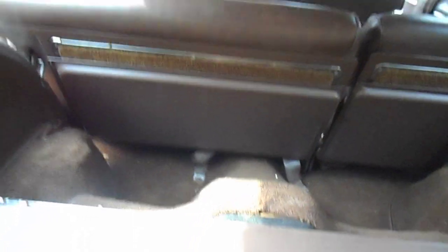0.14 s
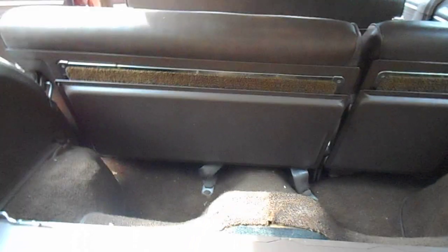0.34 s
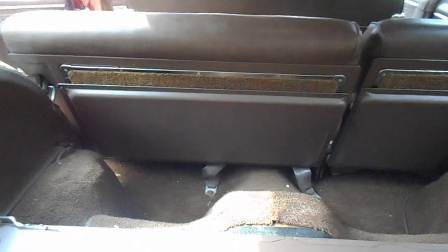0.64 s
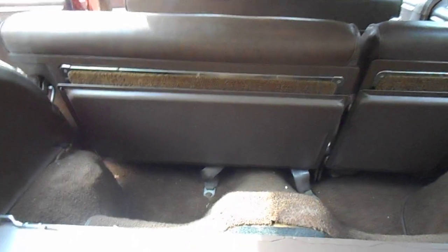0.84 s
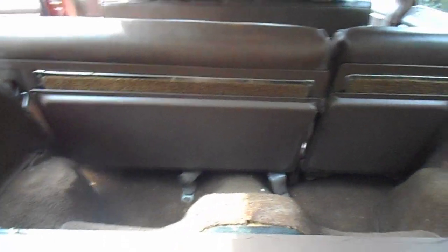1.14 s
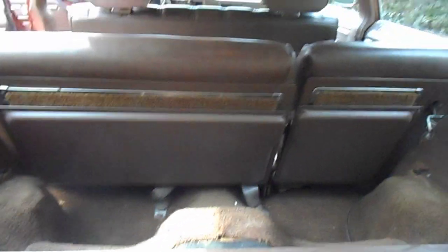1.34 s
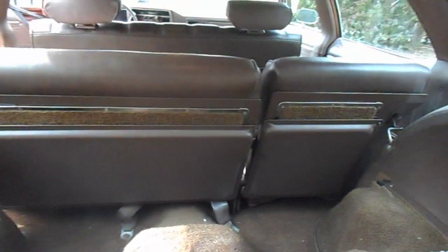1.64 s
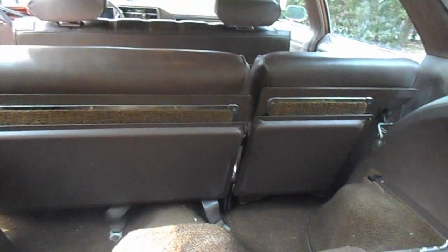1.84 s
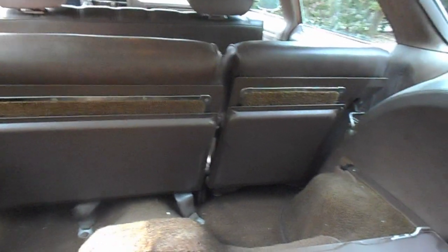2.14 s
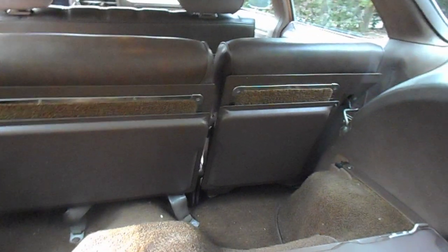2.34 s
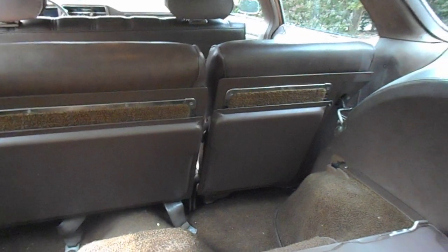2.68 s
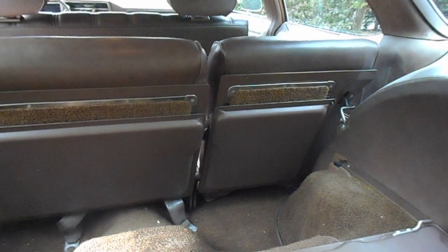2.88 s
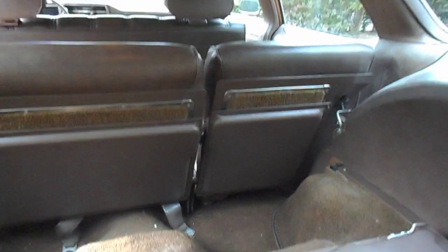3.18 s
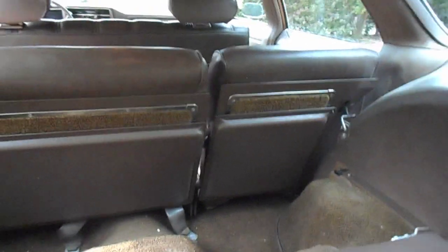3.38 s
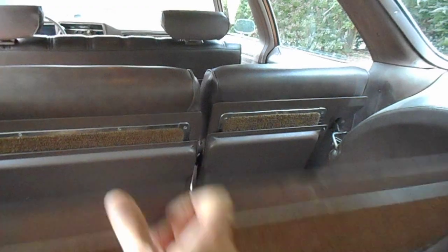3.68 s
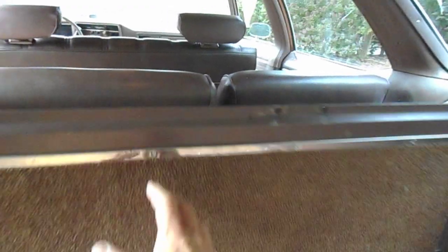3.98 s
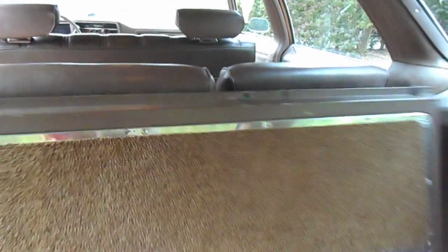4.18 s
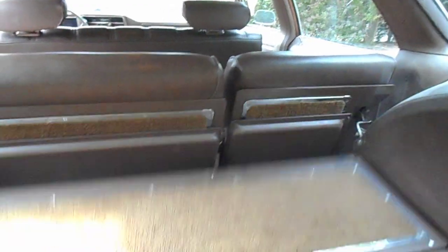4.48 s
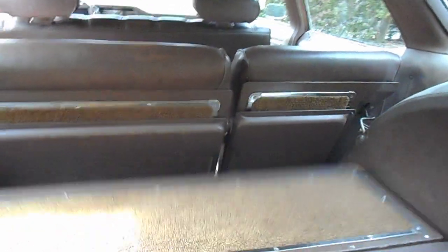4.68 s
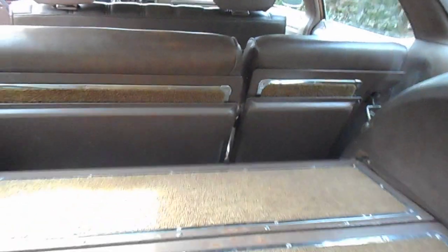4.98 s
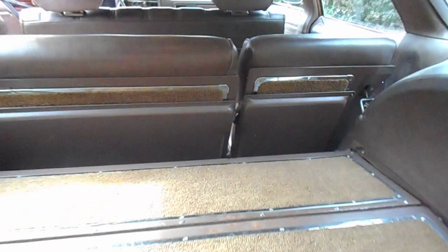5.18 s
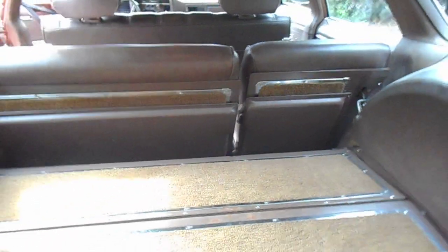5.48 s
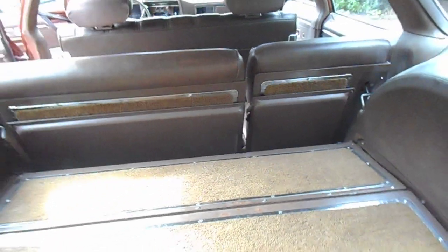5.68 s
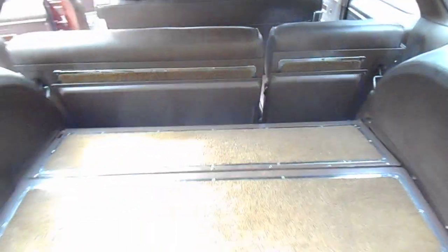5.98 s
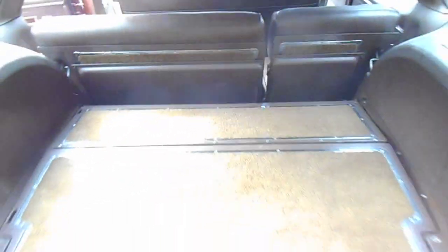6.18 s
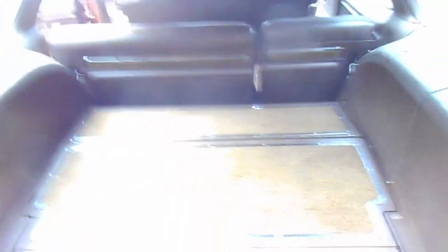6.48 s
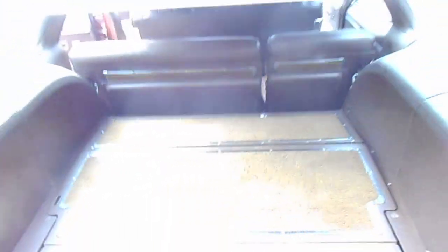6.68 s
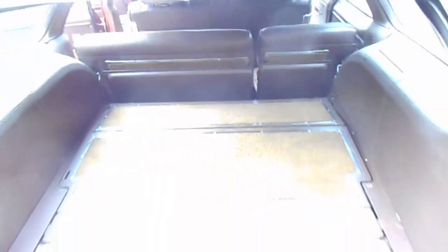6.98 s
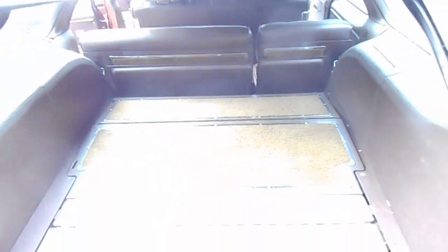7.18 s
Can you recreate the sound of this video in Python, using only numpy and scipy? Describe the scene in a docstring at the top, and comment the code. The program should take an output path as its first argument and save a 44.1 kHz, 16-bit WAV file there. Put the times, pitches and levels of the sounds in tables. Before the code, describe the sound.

Heard close by hand from a car's open tailgate: very quiet outdoor hiss, a faint bird whistle, soft trim knocks and sleeve rustles. Latches clack, then the seat back slams down extremely loud, boomy and rattling, bouncing several times ever faster and softer. A low rumble lingers while a loose fitting taps, hard ticks sound and a hand scuffs vinyl.

```python
"""In the back of an estate car, heard from the open tailgate, a seat back is folded flat and bounces to rest.
Decaying noise for the board and damped modes for shell and cabin air make each slam; a low rumble follows.
Trim knocks, latch clacks and ticks are bursts of resonant noise; cloth and a hand on vinyl are grainy noise.
Squeaks, faint bird whistles and thin far tones are wavering sines, over an outdoor hiss and a distant rush."""
import sys
import numpy as np
from scipy import signal
from scipy.fft import rfft, irfft, next_fast_len
from scipy.io import wavfile
from scipy.ndimage import map_coordinates

SR = 44100
rng = np.random.default_rng(int(sys.argv[2]) if len(sys.argv) > 2 else 0)


def log_audio(samples):
    """Write samples as a 16-bit WAV file to the path given in sys.argv[1]."""
    # one column per channel
    frames = np.atleast_2d(samples).T
    # limit to full scale, then quantise
    limited = np.clip(frames, -1, 1)
    pcm = np.round(limited * 32767).astype(np.int16)
    wavfile.write(sys.argv[1], SR, pcm)


N = 323253  # samples
TIME = np.arange(N) / SR  # seconds


def amp(db):
    """Decibels to gain."""
    return 10 ** (np.asarray(db) / 20)


def unit(x):
    """Scaled to rms 1."""
    return x / np.sqrt(np.mean(x ** 2) + 1e-20)


def along(points, hz):
    """(Hz, value) points read on a log frequency axis."""
    point_hz, values = np.transpose(points)
    return np.interp(np.log(hz + 1), np.log(point_hz + 1), values)


def filtered(x, response):
    """x shaped by a gain that depends on frequency."""
    size = next_fast_len(len(x) + 8192)
    gain = response(np.fft.rfftfreq(size, 1 / SR))
    return irfft(rfft(x, size) * gain, size)[:len(x)]


def noise(spectrum, size=N):
    """Coloured noise of rms 1."""
    return unit(filtered(rng.standard_normal(size), lambda hz: amp(along(spectrum, hz))))


def wobble(rate):
    """A smooth random curve, rate knots a second."""
    knots = np.arange(0, N * rate / SR + 1, 1 / 8)  # the spline is read eight times per knot
    curve = map_coordinates(rng.standard_normal(int(knots[-1]) + 4), [knots])
    return np.interp(TIME * rate, knots, curve)


def fade(t, t60):
    """Exponential decay by 60 dB in t60 seconds."""
    return np.exp(-np.log(1000) * t / np.maximum(t60, 1e-3))


def swell(t, start, end, rise, fall):
    """Speed of a stroke, 0 to 1, with straight rise and fall."""
    return np.clip(np.minimum((t - start) / rise, (end - t) / fall), 0, 1)


def hump(hz, centre_hz, octaves):
    """Gain of a broad resonance."""
    distance = np.log2((hz + 1) / centre_hz) / octaves
    return 1 / (1 + distance ** 2) ** 1.5


def during(start, end):
    """The samples between two times, at least 10 ms of them."""
    return slice(max(round(start * SR), 0), round(max(end, start + .01) * SR))


def add(track, s, x):
    """Mix x into the track at time s."""
    i = max(round(s * SR), 0)
    track[i:i + len(x)] += x[:max(N - i, 0)]


def ring(modes, t, scatter_db, detune=.004):
    """Damped modes; every blow loads them a little differently in strength and pitch."""
    chance = rng.standard_normal((len(modes), 2))
    out = np.zeros(len(t))
    for k, (hz, db, t60) in enumerate(modes):
        gain = (-1) ** k * amp(db + scatter_db * chance[k, 0])
        pitch_hz = hz * (1 + detune * chance[k, 1])
        out += gain * np.sin(2 * np.pi * pitch_hz * t) * fade(t, t60)
    return out


def struck(rows, octaves, t60):
    """Blows (s, dB, centre Hz) on parts with one quickly damped resonance, made of fading noise."""
    out, t = np.zeros(N), np.arange(SR // 5) / SR
    for s, db, centre_hz in rows:
        body = filtered(rng.standard_normal(len(t)),
                        lambda hz: hump(hz, centre_hz, octaves) / (1 + (hz / 10000) ** 20))
        add(out, s, amp(db) * unit(body) * fade(t, t60))
    return out


def friction(spectrum, rate, grain_share):
    """Tiny slips, rate a second, over a smooth hiss, coloured by the rubbed surface."""
    slips = (rng.random(N) < rate / SR) * rng.standard_normal(N)
    force = grain_share * unit(slips) + rng.standard_normal(N)
    return unit(filtered(force, lambda hz: amp(along(spectrum, hz))))


def tone(start, length, first_hz, last_hz, db, waver):
    """An unsteady tone that swells, glides evenly in pitch and fades."""
    t = np.arange(round(max(length, .01) * SR)) / SR
    jitter = waver * map_coordinates(rng.standard_normal(256), [t * 150])
    pitch_hz = np.interp(t, [0, length], [first_hz, last_hz]) * (1 + jitter)
    phase = 2 * np.pi * np.cumsum(pitch_hz) / SR
    envelope = swell(t, 0, length, rise=0.12 * length, fall=0.3 * length)
    out = np.zeros(N)
    add(out, start, amp(db) * np.sqrt(2) * np.sin(phase) * envelope)
    return out


# The seat back landing on the load floor, its bounces ever closer together. Each row: start in seconds,
# strength in dB, treble corner of the contact in Hz, strength of the rattle that follows in dB.
SEAT_BOUNCES = [(4.4835, -2, 6840, -12.5), (4.7607, -2, 2980, -23), (4.9282, -5, 1370, -27),
                (5.0314, -13.5, 590, -26.5), (5.098, -21, 605, -36.5)]
EDGE_S, EDGE_DB = .0105, -2.5  # the first landing is uneven: lag and loss from one edge to the next
RATTLE_S = .054  # the loose board strikes again this long after each bounce


def contacts(count=2):
    """Rows (s, dB, corner Hz): every bounce, its rattle, and the trailing edges of the first landing."""
    blows = [(s, db, hz) for s, db, hz, _ in SEAT_BOUNCES]
    rattles = [(s + RATTLE_S, db, hz) for s, _, hz, db in SEAT_BOUNCES]
    s, db, hz = blows[0]
    edges = [(s + k * EDGE_S, db + k * EDGE_DB, hz) for k in range(1, count + 1)]
    return blows + rattles + edges


# Colour of the seat board when hit. Each row: frequency in Hz, relative level in dB per Hz.
BOARD_COLOUR = [(59, -37.5), (100, -19), (275, -8.5), (383, -10.5), (807, -2.5), (1330, -7.5), (1530, -6),
                (2470, -6.5), (3430, -7.5), (3650, -9), (4880, -9), (8180, -14.5), (9650, -19),
                (11900, -42.5), (14000, -44.5)]
# How long the board sounds. Each row: frequency in Hz, decay by 60 dB in seconds.
BOARD_DECAY = [(100, 0.091), (300, 0.22), (800, .13), (2500, .12), (6000, 0.1), (12000, .09)]
# Modes of board and body shell. Each row: frequency in Hz, relative level in dB, decay by 60 dB in seconds.
SHELL_MODES = [(253, -21.5, 0.19), (283, -19, 0.18), (328, -19.5, 0.1), (504, -19, 0.14), (533, -16, 0.12),
               (661, -16, 0.066), (716, -25, .2), (752, -8, 0.052), (831, -11.5, 0.09), (950, -13.5, 0.033),
               (1161, -10, 0.076), (1269, -10.5, 0.068), (1593, -12, 0.048), (1840, -17, .1),
               (2330, -19, 0.2), (2970, -14.5, 0.075), (3143, -11.5, .06), (3550, -16, 0.078),
               (4720, -18, 0.064), (5440, -19, .09)]
# Modes of the air in the cabin. Each row: frequency in Hz, relative level in dB, decay by 60 dB in seconds.
CABIN_MODES = [(59, -3.5, 0.34), (70, -4.5, 0.22), (96.4, -6.5, 0.23), (119, 0.5, 0.16)]
# Colour of the body's lingering ring. Each row: frequency in Hz, relative level in dB per Hz.
LINGER_COLOUR = [(18, -25), (30, -0.5), (281, -4), (456, -11), (724, -10), (1500, -19.5), (1620, -19.5),
                 (2560, -17), (3780, -26.5), (5450, -23.5), (10000, -43), (13000, -71.5), (22000, -120)]
PUSH_DB, PUSH_SLOPE = -16.5, 0.32  # bass push of a 0 dB blow; dB of bass share gained per dB of softer blow


def seat_back(board_db=-1, shell_db=-0.5, cabin_db=-6, after_db=-33, after_t60=0.9):
    """Each contact rattles the board, rings the shell and pushes the cabin air; softer ones are boomier."""
    out, t = np.zeros(N), np.arange(SR // 2) / SR
    slow_onset = 1 - np.exp(-t / 0.013)
    for s, db, corner_hz in contacts():
        # the board's noise dies away at its own pace in each band
        hz, age, bands = signal.stft(noise(BOARD_COLOUR, size=len(t)), SR, nperseg=256)
        bands = bands * fade(age, along(BOARD_DECAY, hz)[:, None])
        board = signal.istft(bands, SR, nperseg=256)[1][:len(t)]
        blow = amp(board_db) * board + amp(shell_db) * ring(SHELL_MODES, t, scatter_db=2)
        blow = blow * (1 - np.exp(-t / .0006))
        # the contact's corner dulls the blow
        blow = signal.lfilter(*signal.butter(1, min(corner_hz, SR / 3), fs=SR), blow)
        push_db = cabin_db + PUSH_DB - PUSH_SLOPE * db
        boom = amp(push_db) * ring(CABIN_MODES, t, scatter_db=1.5) * slow_onset
        after = amp(after_db) * noise(LINGER_COLOUR, size=len(t)) * fade(t, after_t60) * slow_onset
        add(out, s, amp(db) * (blow + boom + after))
    return out


def sway(s=4.79, level_db=-50, t60=2.45):
    """The car body goes on rumbling softly as it settles: low noise with a long decay."""
    age = np.maximum(TIME - s, 0)
    rumble = noise([(20, -13), (40, -17), (85, 4.0), (130, -23.0), (300, -40.0), (1000, -91)])
    return amp(level_db) * rumble * fade(age, t60) * (1 - np.exp(-age / .03))


# Dull knocks on the padded trim. Each row: start in seconds, level at onset in dB, centre in Hz.
TRIM_KNOCKS = [(.573, -48.5, 407), (1.263, -55.5, 450), (1.615, -56.5, 412), (2.695, -48, 690),
               (2.726, -47, 596), (3.622, -47.5, 470), (3.80, -49.5, 510), (3.832, -50, 556),
               (3.877, -48.5, 450)]
KNOCK_OCTAVES, KNOCK_T60 = 1.18, 0.1  # width; decay in seconds
# Latch and hinge clacking as they let go and swing. Each row: start in seconds, level at onset in dB,
# centre in Hz.
LATCH_CLACKS = [(2.514, -47, 1180), (2.595, -47.5, 4350), (2.644, -47.5, 2360), (3.544, -50, 4180),
                (4.292, -47, 4970), (4.34, -36.5, 1480), (4.659, -42.5, 2940)]
CLACK_OCTAVES, CLACK_T60 = 2.2, 0.069
# Sharp ticks of small hard parts. Each row: start in seconds, level at onset in dB, centre in Hz.
HARD_TICKS = [(4.359, -40.5, 5030), (4.395, -38.5, 6500), (5.4912, -30.5, 2260), (6.3968, -38, 3440),
              (6.618, -31, 3400), (6.697, -35, 4020), (6.889, -44, 1290), (7.008, -35, 2700)]
TICK_OCTAVES, TICK_T60 = 0.68, 0.014


def trim():
    """Padded trim knocks, the latch clacks, small hard parts tick: the harder, the shorter."""
    knocks = struck(TRIM_KNOCKS, KNOCK_OCTAVES, KNOCK_T60)
    clacks = struck(LATCH_CLACKS, CLACK_OCTAVES, CLACK_T60)
    return knocks + clacks + struck(HARD_TICKS, TICK_OCTAVES, TICK_T60)


# A loose fitting tapping. Each row: start in seconds, level of the ring at onset in dB.
FITTING_TAPS = [(1.264, -43.5), (5.249, -35), (5.2862, -38.5)]
TAP_HZ, TAP_OCTAVES, TAP_T60 = 1150, 0.044, 0.042
TAP_THUD_DB, TAP_THUD_HZ = -4, 845  # the contact under the ring, relative to it


def fitting():
    """Each tap is a short thud under the same narrow ring."""
    thuds = [(s, db + TAP_THUD_DB, TAP_THUD_HZ) for s, db in FITTING_TAPS]
    rings = [(s, db, TAP_HZ) for s, db in FITTING_TAPS]
    return struck(thuds, TICK_OCTAVES, TICK_T60) + struck(rings, TAP_OCTAVES, TAP_T60)


# Colour of sleeve on carpet. Each row: frequency in Hz, relative level in dB per Hz.
CLOTH_COLOUR = [(35, -40.5), (60, -9.5), (370, -3), (432, -6), (959, -1), (1600, -5), (2600, -3.5),
                (4520, -6), (9000, -10.5), (12000, -39.5), (15600, -76), (22000, -120)]
# Strokes of cloth on carpet. Each row: start in seconds, length in seconds, level in dB before the
# envelope and flutter, centre of the brightened band in Hz.
CLOTH_STROKES = [(0.612, .11, -59, 1400), (2.228, .1, -60.5, 1370), (2.44, 0.11, -56, 3970),
                 (2.54, 0.035, -52.5, 2800), (2.572, 0.061, -49.5, 4500), (2.709, .17, -51.5, 6160),
                 (2.829, 0.15, -52, 2920), (3.198, 0.047, -53.5, 3570), (3.246, 0.073, -60, 4200),
                 (3.63, 0.17, -61, 6000), (3.835, 0.17, -53, 4100), (4.318, 0.076, -50, 2160),
                 (4.401, 0.1, -50.5, 5500), (5.253, 0.2, -60.5, 5960), (5.464, 0.073, -55, 2750),
                 (5.593, 0.1, -47, 4680), (6.688, 0.15, -56.5, 4530), (6.979, 0.076, -53, 2590)]
STROKE_RISE, STROKE_FALL = 0.24, .42  # shares of a stroke spent speeding up and slowing down


def cloth(level_db=0, flutter_db=1.74, sheen_db=3, octaves=1):
    """Sleeves brush over carpet; each stroke lifts its own band, and the level flutters."""
    out, rub = np.zeros(N), friction(CLOTH_COLOUR, rate=3500, grain_share=0.23)
    for start, length, db, bright_hz in CLOTH_STROKES:
        end = start + length
        span = during(start, end)
        stroke = filtered(rub[span], lambda hz: 1 + amp(sheen_db) * hump(hz, bright_hz, octaves))
        speed = swell(TIME[span], start, end, STROKE_RISE * length, STROKE_FALL * length)
        add(out, start, amp(db) * unit(stroke) * speed)
    return out * amp(level_db + flutter_db * wobble(67))


# Colour of skin on vinyl. Each row: frequency in Hz, relative level in dB per Hz.
VINYL_COLOUR = [(180, -55), (300, -30), (492, -51), (769, -21), (940, -24), (1150, -6.5), (1690, -15),
                (3090, -8.5), (3490, -9.5), (4980, 1), (6880, -14.5), (9370, -19), (11100, -24),
                (12000, -51), (15600, -81), (22000, -120)]
# A hand scuffing on vinyl. Each row: start in seconds, end in seconds, rise in seconds, level in dB
# before the chatter.
HAND_SCUFFS = [(6.394, 6.447, 0.0038, -38), (6.486, 6.555, 0.013, -44), (6.647, 6.722, 0.037, -41)]
SCUFF_FALL_S = 0.02


def scuffs(chatter_db=1.5):
    """Skin sticks and slips on vinyl in three short strokes."""
    stroke = sum(amp(db) * swell(TIME, start, end, rise, SCUFF_FALL_S)
                 for start, end, rise, db in HAND_SCUFFS)
    return stroke * amp(chatter_db * wobble(300)) * friction(VINYL_COLOUR, rate=540, grain_share=0.41)


# Soft handling thumps, close up. Each row: start in seconds, end in seconds, level in dB.
HANDLING_BUMPS = [(0.575, 0.662, -69), (2.478, 2.945, -72.5), (3.78, 3.954, -70), (6.599, 6.638, -64),
                  (6.695, 6.733, -62)]


def handling(edge=0.036):
    """The hand shifts on the microphone with a dull rumble: low noise swelling and falling in edge seconds."""
    push = sum(amp(db) * swell(TIME, start, end, edge, edge) for start, end, db in HANDLING_BUMPS)
    return push * noise([(20, -4), (45, -15), (70, 8), (110, 4), (200, -21), (600, -70)])


# Short rubbery squeaks. Each row: start in seconds, length in seconds, first pitch in Hz, last pitch in Hz,
# level in dB.
UPHOLSTERY_SQUEAKS = [(2.968, .036, 1004, 1280, -46.5), (3.008, 0.029, 1190, 1160, -48.5)]


def squeaks(waver=.012):
    """Two quick chirps of rubbing upholstery, as gliding sines."""
    return sum(tone(*row, waver) for row in UPHOLSTERY_SQUEAKS)


# Rising bird whistles, far off outside. Each row: start in seconds, length in seconds, first pitch in Hz,
# last pitch in Hz, level in dB before the direct and echo gains.
BIRD_WHISTLES = [(0.612, .18, 1866, 2393, -57), (1.21, .08, 1750, 2370, -65.5)]


def birds(direct_db=-1, echo_db=-4, echo_t60=0.93, waver=.01):
    """Distant whistles, smeared by the garden's echoes, a decaying noise tail."""
    song = sum(tone(*row, waver) for row in BIRD_WHISTLES)
    t = np.arange(SR) / SR
    tail = rng.standard_normal(SR) * fade(t, echo_t60)
    echo = signal.fftconvolve(song, tail / np.linalg.norm(tail))[:N]
    return amp(direct_db) * song + amp(echo_db) * echo


# Thin tones from afar. Each row: start in seconds, length in seconds, pitch in Hz, level in dB.
DISTANT_TONES = [(0, 0.18, 1375, -64.5), (3.754, 0.069, 1020, -61.5), (4.17, 0.12, 795, -63.5),
                 (5.425, .11, 1090, -56.5), (5.508, 0.11, 760, -57), (5.919, .08, 1413, -65),
                 (6.599, .065, 1065, -55.5), (6.861, 0.13, 1044, -65)]


def far_tones(waver=0.023):
    """Faint tones that waver around a constant pitch."""
    return sum(tone(s, length, hz, hz, db, waver) for s, length, hz, db in DISTANT_TONES)


# Colour of the outdoor hiss. Each row: frequency in Hz, relative level in dB per Hz.
HISS_COLOUR = [(15, -38.5), (25, -8), (106, -13), (262, -13.5), (306, -7), (407, -10.5), (463, -6),
               (839, -7.5), (1140, -5), (1480, -6.5), (3850, -9), (8360, -16), (12000, -46.5),
               (15600, -80.5), (22000, -120)]
# Colour of the distant rush. Each row: frequency in Hz, relative level in dB per Hz.
RUSH_COLOUR = [(60, -21), (250, -8), (550, -1), (1100, 3), (1700, -7.5), (3000, -18.5)]
# Course of the distant rush. Each row: time in seconds, level in dB before far_db and the drift.
RUSH_LEVEL = [(0, -63), (.4, -75), (2, -68.5), (3.5, -66), (4.2, -65.5), (5.5, -54.5), (5.85, -59),
              (7.33, -65.5)]


def outdoors(hiss_db=-62, far_db=-3, drift_db=2):
    """A steady noise hiss and a distant noise rush that slowly swells and sinks."""
    level_db = np.interp(TIME, *np.transpose(RUSH_LEVEL))
    rush_gain = amp(level_db + far_db + drift_db * wobble(2))
    return amp(hiss_db) * noise(HISS_COLOUR) + rush_gain * noise(RUSH_COLOUR)


def scene():
    """Everything as heard from the open tailgate."""
    car = seat_back() + sway() + trim() + fitting()
    hands = cloth() + scuffs() + handling() + squeaks()
    return (car + hands + birds() + far_tones() + outdoors())[None]


def record(dry, top=.7, hardness=7, top_hz=16000):
    """The microphone rolls off its treble, and the hardest blows overload the input smoothly below top."""
    x = filtered(dry[0], lambda hz: amp(along([(10000, 0), (11000, -15), (13000, -33)], hz)))
    x = x / (1 + np.abs(x / top) ** hardness) ** (1 / hardness)
    # a second roll-off, with nothing left above top_hz
    x = filtered(x, lambda hz: amp(along([(9000, 1), (13000, -5.5)], hz)) * (hz < top_hz))
    return x[None]


dry = scene()
out = record(dry)
log_audio(out)
```